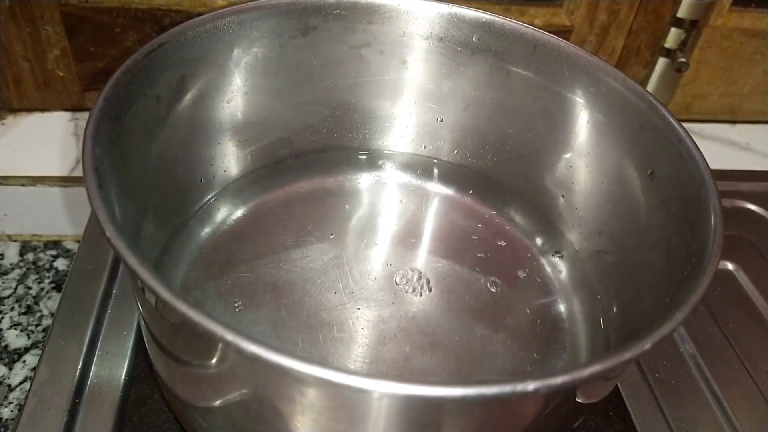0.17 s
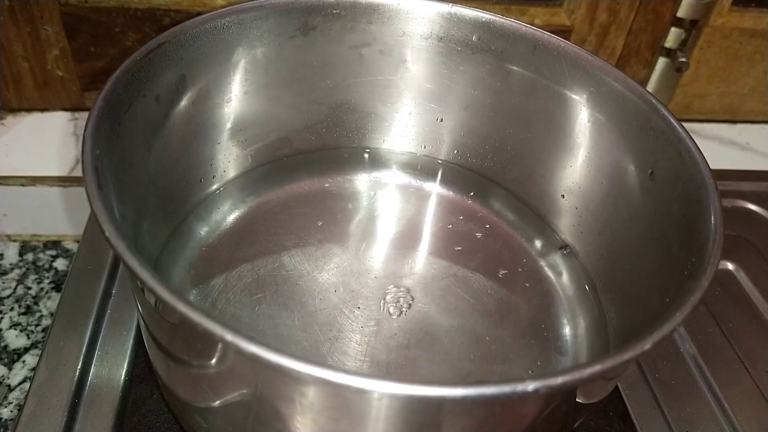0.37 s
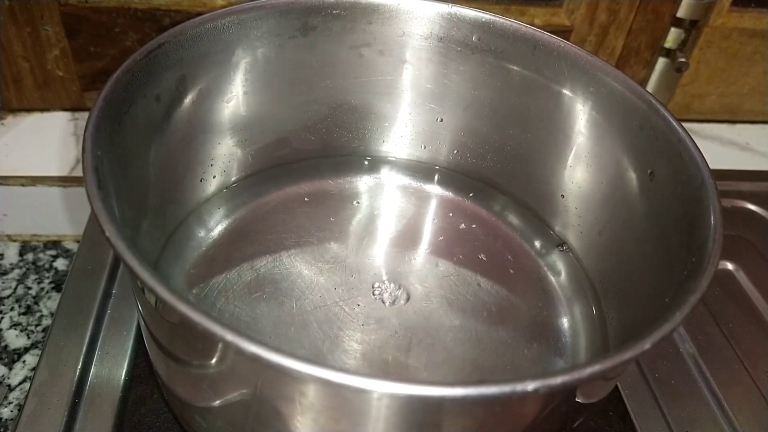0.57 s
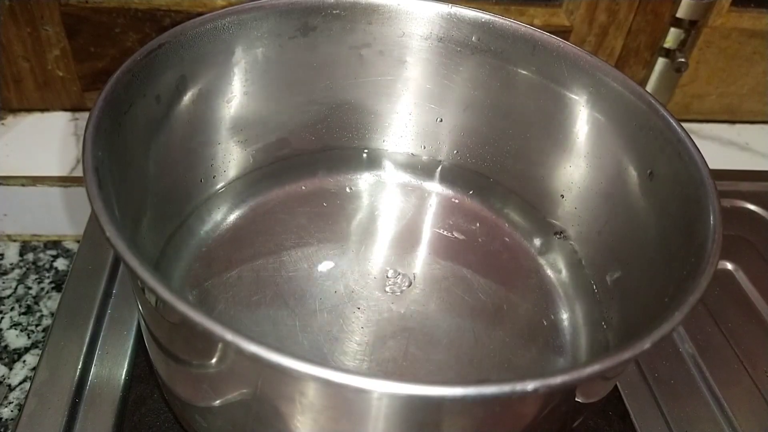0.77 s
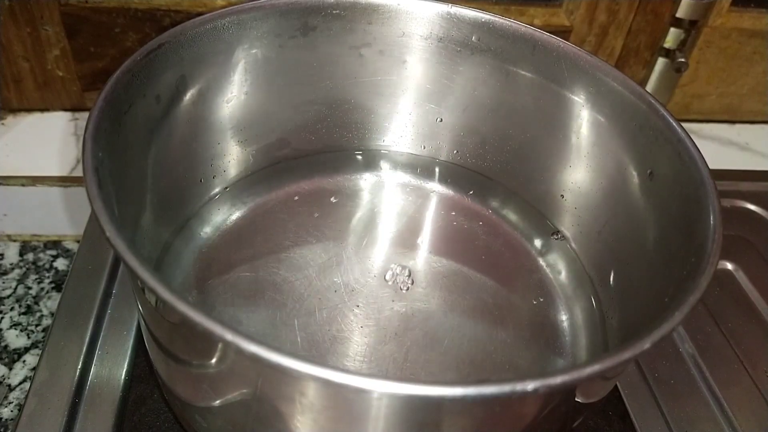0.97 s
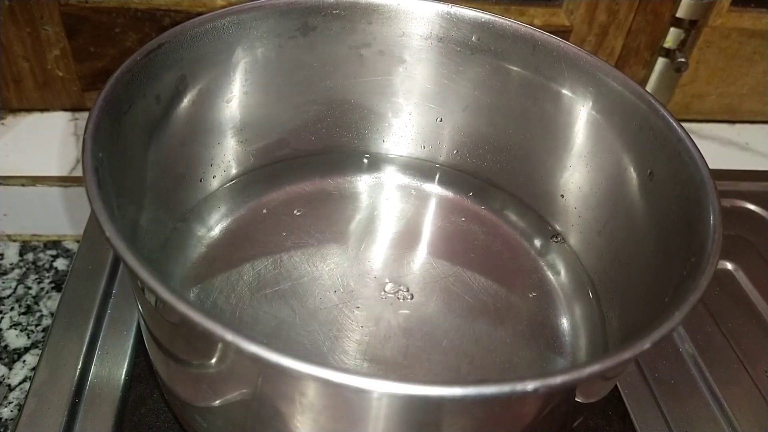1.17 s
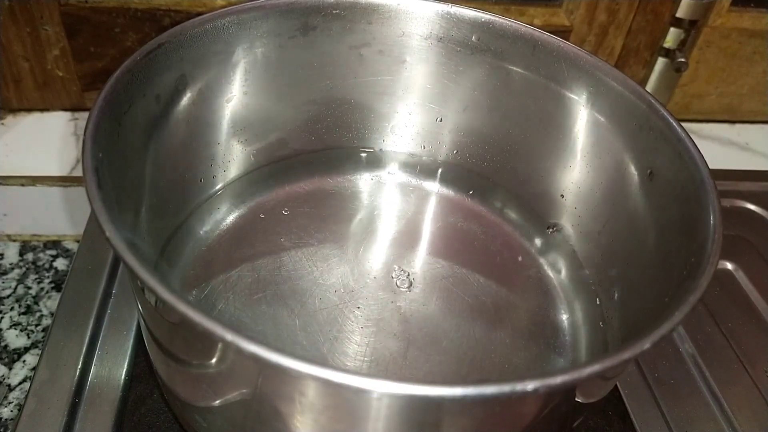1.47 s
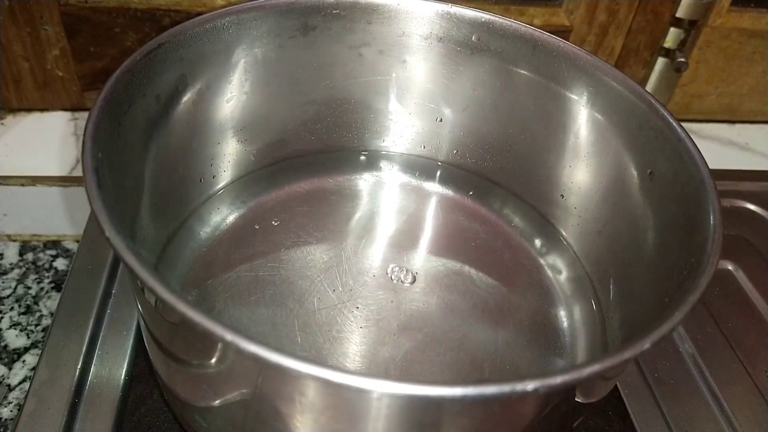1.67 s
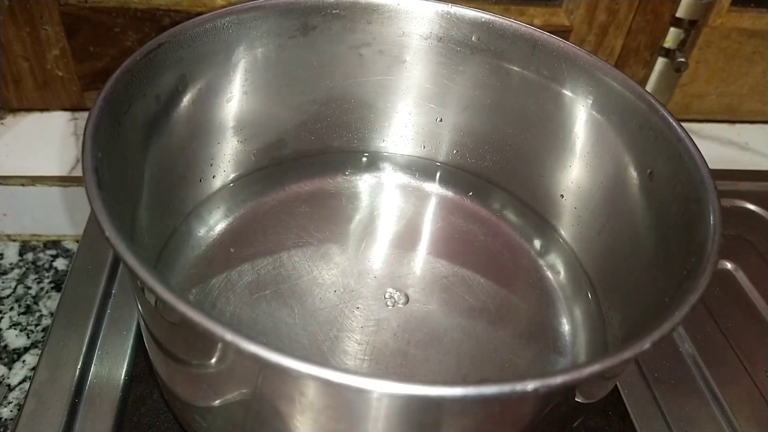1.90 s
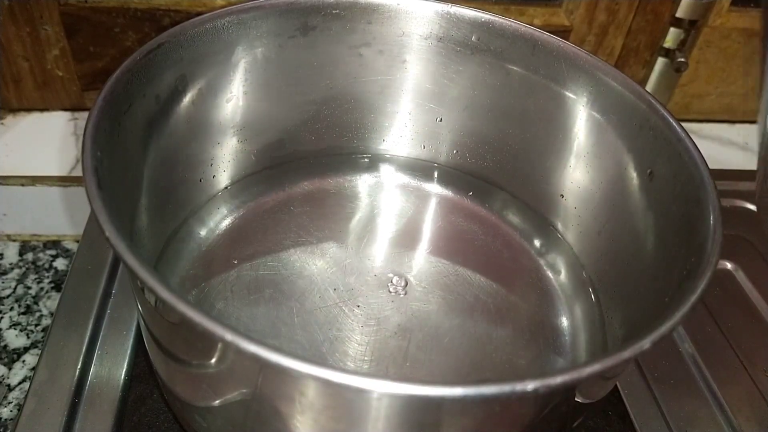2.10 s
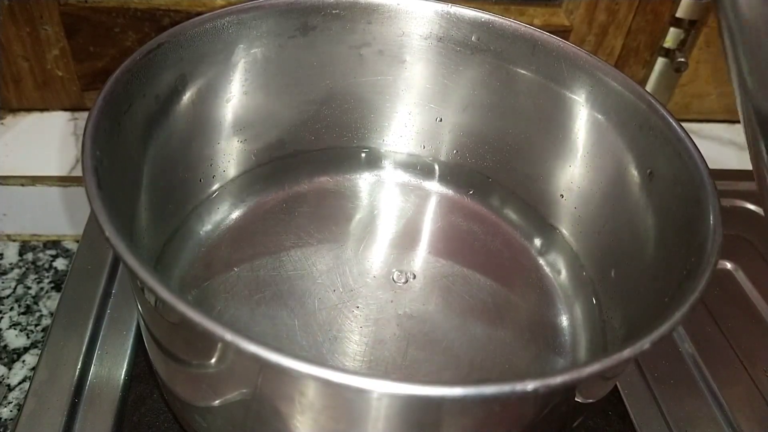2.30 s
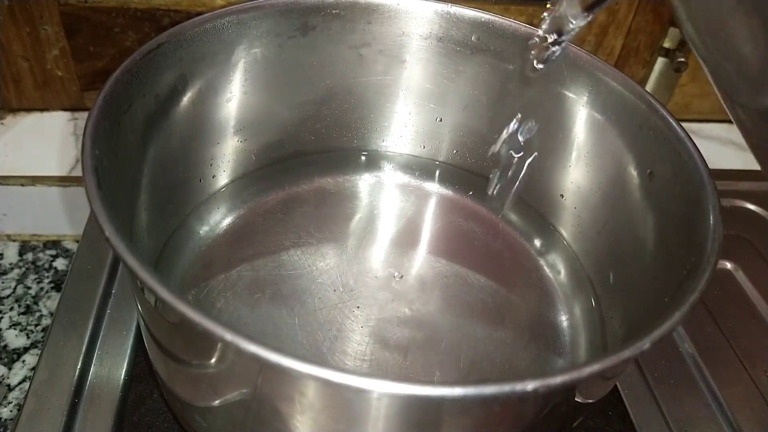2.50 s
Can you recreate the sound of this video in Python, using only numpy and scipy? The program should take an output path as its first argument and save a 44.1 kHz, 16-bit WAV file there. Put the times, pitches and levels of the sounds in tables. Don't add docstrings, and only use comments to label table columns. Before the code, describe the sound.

Ringing scrapes of vessels on a stone worktop: first a jug drag and a hard knock, then a quiet gap, then several glass jerks getting stronger, in a reverberant kitchen with low hum and hiss, recorded in stereo.

```python
import sys
import numpy as np
from scipy import signal
from scipy.fft import rfft, irfft
from scipy.io import wavfile
from scipy.ndimage import uniform_filter1d

SR = 44100
rng = np.random.default_rng(int(sys.argv[2]) if len(sys.argv) > 2 else 0)


def to_wav(s):
    ch = np.atleast_2d(s).T
    pcm = np.round(np.clip(ch, -1, 1) * 32767)
    wavfile.write(sys.argv[1], SR, pcm.astype(np.int16))


def invert_db(x):
    u = np.asarray(x, float) / 20
    return 10 ** u


N = 116865


def evened(x):
    return x / np.sqrt(np.mean(x ** 2) + 1e-20)


def read(points, hz):
    f, value = np.transpose(points)
    return np.interp(np.log(hz + 1), np.log(f + 1), value)


def add(mix, start_s, sound):
    part = mix[max(round(start_s * SR), 0):][:len(sound)]
    part += sound[:len(part)]


def colour(x, points):
    gain = invert_db(read(points, np.fft.rfftfreq(len(x), 1 / SR)))
    return irfft(rfft(x) * gain, len(x))


def resonate(x, hz, width_hz):
    decay = np.exp(-np.pi * width_hz / SR)
    pole = decay * np.exp(2j * np.pi * hz / SR)
    return np.sqrt(2 * (1 - decay ** 2)) * signal.lfilter([1], [1, -pole], x).imag


def blend(a, b, same):
    return same * a + np.sqrt(1 - same ** 2) * b


def pair(a, b, same, left_db):
    balance = invert_db(left_db / 2)[:, None]
    same = np.clip(same, 0, 1)[:, None]
    return np.array([a * balance, blend(a, b, same) / balance])


def ears(x, lag_s):
    return np.array([x, np.roll(x, round(lag_s * SR))])


def glass():
    # start_s, length_s, force_db, first_mode_db, second_mode_db
    slides = [
        (.87, 0.13, -75.5, -14, -11),
        (1.333, 0.094, -60, -3.5, -2.5),
        (1.611, 0.097, -53, -1.5, -0.5),
        (1.874, 0.084, -45.5, 0, -8.5),
        (2.227, 0.096, -45.5, 3, 0),
    ]
    # pitch_hz, width_hz, level_db
    modes = [(1021.6, 32, 1), (2584, 82, 2.2), (3946, 24.6, 4), (1649, 140, -17.5), (4230, 180, -39.5),
             (6600, 57, -32), (7145, 57, -7.5), (10400, 60, -20.5), (11340, 30, -9), (13010, 95, -10),
             (15300, 74, -14), (15100, 60, -20)]
    # pitch_hz, level_db
    grit = [(760, -33.5), (1000, -4), (2800, 9.5), (4800, -2.5), (5900, -23.5), (7200, 9.5), (8200, -51),
            (15000, -36)]
    # start_s, level_db, second_mode_db, third_mode_db
    catches = [(1.341, -65, -8, -6), (1.3883, -65, -1, -3), (1.6242, -50, -0.5, 9), (1.65, -50, 3, 16),
               (1.69, -45, -11.5, 3), (1.7253, -54, -7, 2), (1.8913, -34, -13, 0), (1.932, -42, -10, 1),
               (1.9552, -40, -11, 1), (1.9852, -40, -8, 1), (2.0277, -44, -6, 4), (2.084, -52, -12, -3),
               (2.2364, -38, -10, -2), (2.2501, -36, -5, 3), (2.284, -40, 10, 0), (2.31, -50, 2, -5),
               (2.335, -42, -2, 10), (2.38, -50, -2, -5)]
    return vessel(slides, catches, modes, grit, grit_db=-5.5, rise=0.23, lag_s=0.00025, left_db=0.6)


def jug():
    # start_s, length_s, force_db, first_mode_db, second_mode_db
    drags = [
        (.0, 0.004, -68.5, -2, -4),
        (0.07, 0.108, -49, 5.5, -2.5),
    ]
    # pitch_hz,
    # width_hz, level_db
    modes = [(1128.8, 26, -0.2), (2594, 120, -2.5), (783, 15, -8.5), (1650, 49, -17.5), (3230, 200, -9),
             (3876, 37, -12.5), (4100, 35, -15), (7082, 32, -8.5), (13100, 150, -33)]
    # pitch_hz, level_db
    grit = [(300, 4.5), (650, 1), (1050, -13), (3000, 1.5), (5600, -11), (7200, -20), (8000, -33),
            (15000, -18)]
    # start_s, level_db, second_mode_db, third_mode_db
    catches = [
        (.0772, -46, -13, -15),
        (0.1077, -30, -17, -13),
        (0.124, -35, -14, -20),
        (0.174, -48, -20, -23),
        (0.22, -52, -12, -24),
        (0.2633, -53, -18, -25),
        (0.2984, -48, -14.5, -30.5),
    ]
    return vessel(drags, catches, modes, grit, grit_db=-7.5, rise=0.22, lag_s=-0.00025, left_db=-1.0)


def vessel(rows, catches, modes, grit, grit_db, rise, lag_s, left_db):
    caught = jolts(catches, modes)
    faces, wet = np.zeros((2, N)), np.zeros((2, N))
    for row in rows:
        one = np.zeros((2, N))
        for face in one:
            start_s, sound = slide(modes, grit, grit_db, rise, *row)
            add(face, start_s, sound)
        faces = faces + one
        wet = wet + room(one[0])
    near = np.array([faces[0], blend(faces[0], faces[1], 0.18)]) + ears(caught, lag_s)
    balance = invert_db([[left_db], [-left_db]])
    return invert_db(-6) * near * balance + invert_db(-3) * (wet + room(caught))


def slide(modes, grit, grit_db, rise, start_s, length_s, force_db, first_db, second_db):
    # pitch_hz, level_db
    ring_colour = [(250, -19.5), (800, 0.07), (7500, -0.18), (8300, -22.5), (16000, -17)]
    grains_per_s, spread_db, stutter_db, lift_t60_s = 2500, 3, 1.5, 0.21
    bite, bite_s = 2.54, 0.0091
    t = np.arange(SR // 2) / SR
    hit, size, slow = rng.random((len(t), 3)).T

    ways = rng.random((len(t), len(modes) + 1)).T - .5
    grain_sizes = (hit < grains_per_s / SR) * invert_db(-spread_db * np.log(size + .01))
    grains = ways * np.sqrt(12) * evened(grain_sizes)

    stutter = evened(uniform_filter1d(uniform_filter1d(slow - .5, size=400), size=400))
    lift_db = -60 * np.maximum(t - length_s, 0) / lift_t60_s
    push = np.minimum(t / (rise * length_s), 1) * invert_db(lift_db)
    drive = grains * push * invert_db(force_db + stutter_db * stutter)
    drive[0] *= 1 + bite * np.exp(-t / bite_s)

    trim_db = [first_db, second_db] + [0] * len(modes)
    rung = np.zeros(len(t))
    for x, (hz, width_hz, db), trim in zip(drive, modes, trim_db):
        rung += invert_db(db + trim) * resonate(x, hz, width_hz)
    scrape = colour(drive[-1], grit) / colour(grains[-1], grit).std()
    return start_s, colour(rung, ring_colour) + invert_db(grit_db) * scrape


def jolts(catches, modes):
    out, t = np.zeros(N), np.arange(SR // 8) / SR
    rise = np.minimum(t / 0.009, 1)
    phases = rng.random((len(catches), 3))
    for (start_s, db, second_db, third_db), turns in zip(catches, phases):
        ring = np.zeros(len(t))
        for (hz, width_hz, _), mode_db, turn in zip(modes, (0, second_db, third_db), turns):
            ring += invert_db(mode_db) * np.exp(-np.pi * width_hz * t) * np.sin(2 * np.pi * (hz * t + turn))
        add(out, start_s, invert_db(db - 5.5) * rise * ring)
    return out


def knock():
    # pitch_hz, level_db, t60_s
    knock_modes = [(258, -13.5, 0.059), (504, -25, 0.21), (623, -2, 0.054), (684, -4.5, 0.062),
                   (738, 4.5, 0.033), (802, -8.5, 0.03), (1075, -7.5, 0.076), (1175, -11.5, 0.087),
                   (1296, -14.5, 0.058), (1996, -16.5, 0.04), (2778, 1, .011), (3010, -3.5, 0.0063),
                   (3900, -16, 0.021), (6210, -37, 0.024)]
    # pitch_hz, level_db
    crack_colour = [(420, -27), (700, 1.5), (950, -5.5), (2800, -13.5), (5600, -27), (7000, -9),
                    (8000, -32), (14000, -23.5)]
    # pitch_hz, level_db
    body = [(260, -0.5), (330, -4), (470, -6.5), (600, -1), (780, 0), (900, -2), (1100, 0), (16000, 1)]
    start_s, level_db, rise_s = .3392, -20.5, 0.0016
    crack_db, crack_t60_s = -2.5, 0.017
    t = np.arange(SR // 4) / SR
    ring = sum(invert_db(db - 60 * t / t60_s) * np.sin(2 * np.pi * hz * t) for hz, db, t60_s in knock_modes)
    noise = evened(colour(rng.standard_normal(len(t)), crack_colour))
    crack = noise * invert_db(crack_db - 60 * t / crack_t60_s)
    out = np.zeros(N)
    add(out, start_s, -invert_db(level_db) * (ring + crack) * np.minimum(t / rise_s, 1))
    return colour(out, body)


def small():
    # start_s, level_db, centre_hz, width_hz, length_s
    ticks = [(0.327, -59.5, 6800, 2520, 0.011), (0.337, -37.5, 710, 260, 0.006),
             (0.491, -69, 13430, 298, 0.032), (0.504, -70.5, 10800, 6000, 0.023),
             (0.7, -77, 9700, 3100, 0.0028), (0.827, -70.5, 7300, 677, 0.029),
             (0.826, -72, 14500, 3900, 0.032), (0.829, -76, 3080, 3020, 0.044),
             (2.203, -58, 297, 202, 0.051), (2.6, -65.5, 286, 188, 0.18), (.0, -63.5, 120, 119, 0.048),
             (0.804, -66.5, 205, 316, 0.04), (2.526, -73.5, 7200, 1490, 0.17),
             (0.088, -65, 330, 120, 0.044)]
    bump_starts = [
        .001,
        .11,
        .345,
        .37,
        2.25,
        2.36,
    ]
    # level_db, pitch_hz, t60_s
    bumps = [(-74, 130, 0.13), (-60, 100, .39), (-53, 142, 0.34), (-59, 88, 0.5), (-63, 90.7, 0.25),
             (-60, 88, 0.28)]
    out, t = np.zeros(N), np.arange(SR // 2) / SR
    for start_s, db, hz, width_hz, length_s in ticks:
        age = 3 * t / length_s
        shape = age * np.exp(1 - age)
        noise = resonate(rng.standard_normal(len(t)), hz, width_hz)
        add(out, start_s, invert_db(db) * shape * evened(resonate(noise, hz, width_hz)))
    rise = np.minimum(t / 0.0066, 1)
    for start_s, (db, hz, t60_s) in zip(bump_starts, bumps):
        add(out, start_s, invert_db(db - 60 * t / t60_s) * rise * np.sin(2 * np.pi * hz * t))
    return out


def room(x):
    # pitch_hz, t60_s
    decay = [(100, 0.84), (400, 0.21), (1000, 0.53), (3000, 0.53), (7000, 0.54), (14000, 0.36)]
    # pitch_hz, likeness
    echo_same = [(60, 1), (200, 0.85), (400, 0.27), (700, 0.057), (16000, 0.022)]
    # pitch_hz, left_over_right_db
    echo_left = [(500, -0.4), (4000, 0.5), (8000, -0.5), (13000, 9.5)]
    taps = np.zeros((2, SR))
    places = np.arange(120, SR - 20, 20)
    at = places + rng.integers(0, 20, (2, len(places)))
    np.put_along_axis(taps, at, rng.choice([-1., 1.], at.shape), 1)

    hz, t, z = signal.stft(taps, SR, nperseg=256)
    z = pair(z[0], z[1], read(echo_same, hz), read(echo_left, hz))
    z = z * invert_db(-60 * t / read(decay, hz)[:, None])
    tail = signal.istft(z, SR, nperseg=256)[1]
    return signal.fftconvolve(x[None], tail / np.linalg.norm(tail[0]), axes=1)[:, :N]


def floor():
    # pitch_hz, level_db_per_hz
    hiss = [(60, -14.5), (100, -3.5), (300, -12), (700, -18), (4000, -23.5), (7600, -29), (9500, -31.5),
            (15200, -32.5)]
    # pitch_hz, likeness
    hiss_same = [(60, 1), (240, 0.64), (950, 0.24), (3770, -1.8), (15000, -0.32)]
    # pitch_hz, left_over_right_db
    hiss_left = [(60, -1), (380, 1), (2380, -0.5), (15000, 2)]
    # time_s, lift_db
    stir = [
        (0, 2.5),
        (.6, 4),
        (.9, 2.5),
        (1.15, -0.6),
        (2.1, 4.5),
        (2.55, 7),
        (2.65, 8),
    ]
    # pitch_hz, width_hz, level_db
    hums = [(87, 7.2, -75), (172, 5.3, -79.5), (289.3, 4.7, -79.5), (7440, 130, -88)]
    frames, hz = N // 256 + 5, np.fft.rfftfreq(1024, 1 / SR)
    a, b, c, d, patches = rng.standard_normal((frames, len(hz), 5)).T
    patches = uniform_filter1d(patches, size=10, axis=0)
    patches = evened(uniform_filter1d(patches, size=12, axis=1))

    z = pair(a + 1j * b, c + 1j * d, read(hiss_same, hz), read(hiss_left, hz))
    z = z * invert_db(read(hiss, hz))[:, None]
    rms = signal.istft(z.mean(0), nperseg=1024, noverlap=768)[1].std()
    stir_db = np.interp((np.arange(frames) - 2) * 256 / SR, *np.transpose(stir))
    z = z * invert_db(1.85 * patches + stir_db * np.clip(hz / 600, 0, 1)[:, None])
    noise = signal.istft(z, nperseg=1024, noverlap=768)[1][:, :N] / rms

    hum = sum(invert_db(db) * evened(resonate(rng.standard_normal(N), f, width_hz)) for f, width_hz, db in hums)
    return invert_db(-74.5) * noise + hum


def scene():
    knock_sides_db = [
        [-1.5],
        [-9],
    ]
    vessels = glass() + jug()
    blow, bits = knock(), small()
    direct = ears(blow, lag_s=0.00061) * invert_db(knock_sides_db) + bits
    return direct + vessels + room(invert_db(2.0) * blow + invert_db(3) * bits) + floor()


def gated(x):
    # pitch_hz, level_db
    silenced_under = [(7700, -10.5), (8100, -17.5), (9300, -20), (10200, -34.5), (15000, -29.5)]
    hz, t, z = signal.stft(x, SR, nperseg=1024, noverlap=768)
    power = uniform_filter1d(abs(z) ** 2, size=7, axis=2)
    bands = power[:, :512].reshape(2, 64, 8, -1).mean(2).repeat(8, 1)
    hz = hz[:-1]
    peak = bands[:, (hz > 6800) & (hz < 7500)].max(1)[:, None]
    weak = bands < peak * invert_db(2 * read(silenced_under, hz))[:, None]
    keep = np.where(weak & (hz > 7850)[:, None], invert_db(-36), 1)
    keep = np.concatenate([keep, keep[:, -1:]], 1)
    return signal.istft(z * keep, SR, nperseg=1024, noverlap=768)[1][:, :N]


def low_pass(x):
    return signal.sosfilt(signal.butter(12, 16040, fs=SR, output="sos"), x)


def record(dry):
    # pitch_hz, level_db
    reach = [(20, -28), (45, -17), (70, 0), (15760, 0), (15880, -50)]
    heard = np.array([colour(channel, reach) for channel in dry])
    return low_pass(gated(heard))


dry = scene()
out = record(dry)
to_wav(out)
```